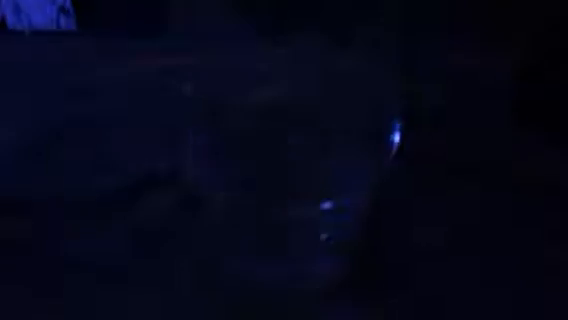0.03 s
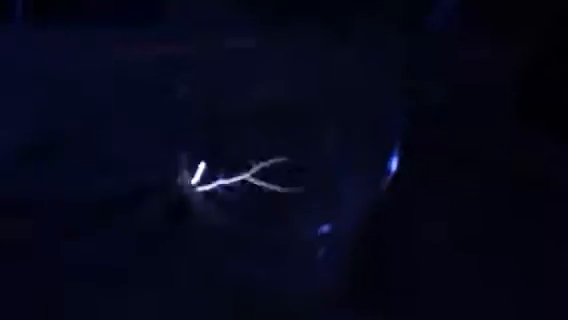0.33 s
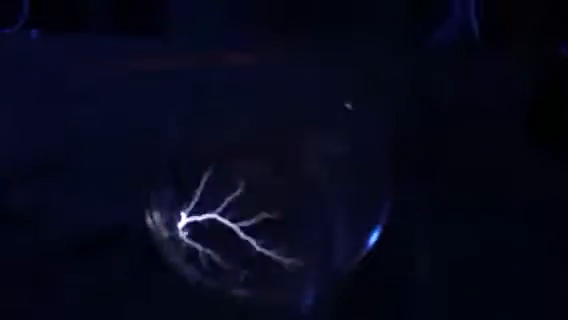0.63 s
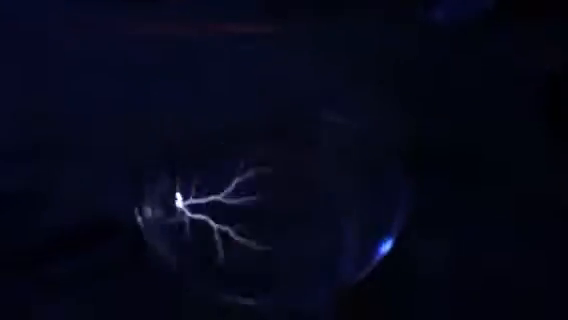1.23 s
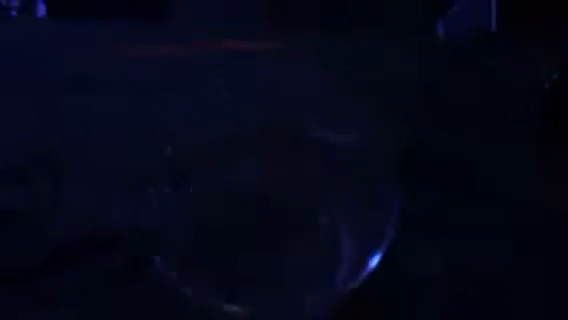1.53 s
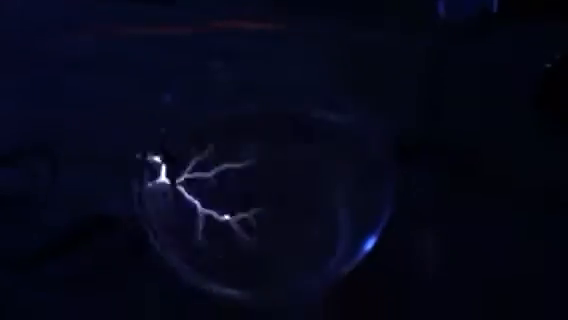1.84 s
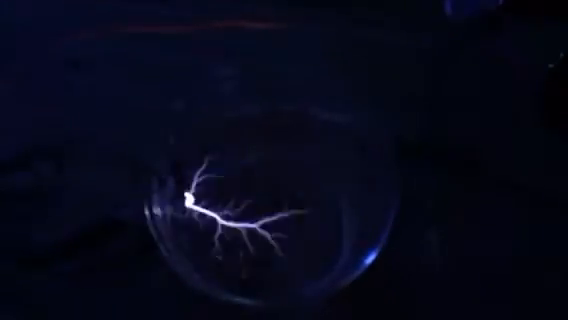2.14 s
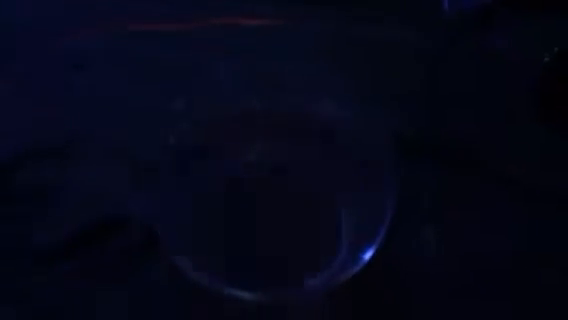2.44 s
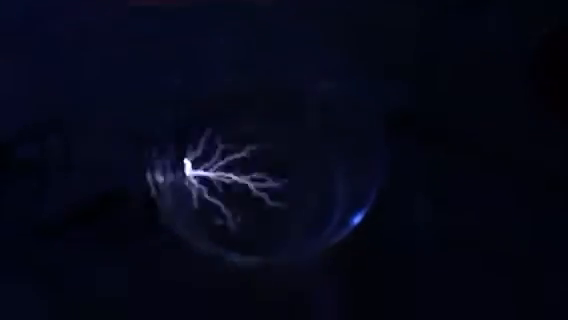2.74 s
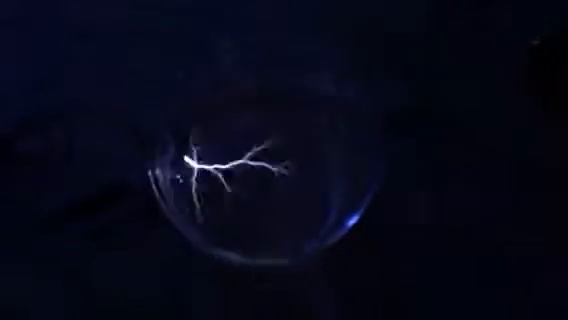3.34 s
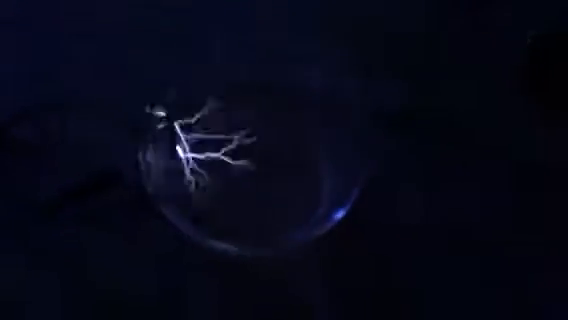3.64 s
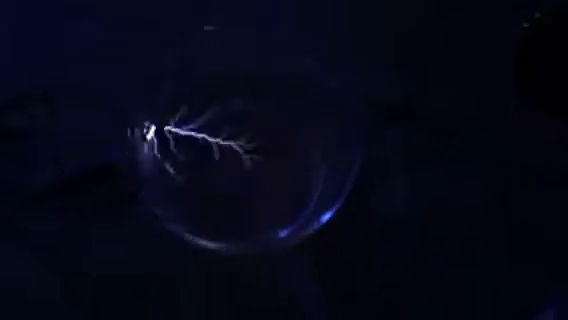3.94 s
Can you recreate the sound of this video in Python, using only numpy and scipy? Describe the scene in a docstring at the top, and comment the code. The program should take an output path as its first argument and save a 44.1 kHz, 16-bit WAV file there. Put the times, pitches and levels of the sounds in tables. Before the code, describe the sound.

High-voltage sparks snap in a rapid, steady stream inside a glass globe, making a harsh crackling buzz. Occasional low thumps hit the close microphone, and a small hard room adds bright, short echoes.

```python
"""Sparks in a glass globe

High-voltage sparks, about thirty a second, jump close to a microphone in a small hard room.
Each snaps with its own colour, rings the glass and returns as bright echoes and a short hiss
of reverberation. Each is followed by a small low microphone thump, some by a loud one.
A faint room rumble lies underneath."""
import sys
import numpy as np
from scipy import signal
from scipy.io import wavfile

SR = 44100
rng = np.random.default_rng(int(sys.argv[2]) if len(sys.argv) > 2 else 0)


def to_wav(s):
    """Save 16-bit WAV."""
    ch = np.atleast_2d(s).T  # columns
    pcm = np.round(np.clip(ch, -1, 1) * 32767)  # PCM
    wavfile.write(sys.argv[1], SR, pcm.astype(np.int16))


N = 176400

# sparks, with strength in four registers: t/s, knock/dB, bite/dB, sizzle/dB, fizz/dB
SPARKS = [(0.1209, -4.5, -6, -1, 2), (0.1613, 1, -9, -1, -0.5), (0.1665, 2, -6, -4, -8),
          (0.2093, -1, 1, 2.5, 2), (0.2456, 3, -7, -2, 2), (0.2538, -8, -2, -0.5, -6),
          (0.2934, 2.5, -2, -1.5, 2), (0.3016, -2, -3, -2, -6), (0.3437, 7.5, -11, 5, 2),
          (0.3906, 4, -1.5, 1.5, 1), (0.4272, 4.5, -4, -2, 0), (0.438, 0, -6, 1, -3),
          (0.4757, 8.5, -12, 6, -1.5), (0.511, 1, -3, -1.5, -1), (0.5456, 3.5, 0, -6, -1),
          (0.5913, 6, 1, 0, -9), (0.6271, 0, -3, -3, 0), (0.6614, 3.5, -0.5, -8, 1.5),
          (0.7084, 3.5, 1, 0.5, 1), (0.7444, -3, -5, -1, 0), (0.7782, 3.5, 1.5, 2, -5),
          (0.8245, 1.5, 3, 4, -1), (0.8607, -2, -3, -3, 0), (0.8939, 2.5, 1.5, 3, 0),
          (0.9405, 1, 2, 2.5, -1), (0.9765, 0, -1, -1, -1.5), (1.0107, 4, 4, 1, 0),
          (1.0447, 0, -3, -1.5, 0), (1.0785, 3, 2.5, 3, -3), (1.1247, 3, 1.5, 3.5, -6),
          (1.1608, 0.5, -3.5, -1, 2), (1.1947, 4, 5.5, 1.5, -4), (1.241, 4.5, 3.5, 2, 1.5),
          (1.2771, 0, -2, -2, -0.5), (1.3115, 3, 4, 2.5, -2), (1.3579, 3, 3, 3, -2),
          (1.3942, 0, -2.5, 1, 0), (1.4026, -4.5, -5, 1, -8), (1.444, 6, -10.5, 5, 0.5),
          (1.4918, 4, 4.5, -5, -4), (1.5271, -1, -4, -2.5, 4.5), (1.5376, 4, 0, -2, -3),
          (1.5762, 6.5, -11, 4, -1), (1.6245, 3.5, 4.5, 1.5, 2), (1.6615, -4, -5, -1, -1),
          (1.6684, 0.5, -2, 1, -1), (1.711, 2.5, -10, 5, 0.5), (1.7583, 2, 6, 2, -2), (1.794, 2, -4, 1, 2),
          (1.8034, 2, -2, -3, -3), (1.843, -14, -5, -4, -3), (1.851, 0.5, 0, 0, 0),
          (1.8941, 5.5, -10, 4.5, -2), (1.9409, 4, 3.5, 2, 0), (1.9775, -0.5, -4, -2, -0.5),
          (2.0242, 2.5, 3.5, 3, 3), (2.0606, -2, -4, 3, 1), (2.0704, 3.5, 3.5, -5, -8),
          (2.1102, -0.5, 0.5, 0, 1.5), (2.118, -1, -6, -4, -3), (2.1588, -2, 2, 0.5, 0),
          (2.1948, 1.5, -1, 1, 0.5), (2.2008, -1, -3, -4, -7), (2.2435, 0, 3.5, 2, -3),
          (2.2515, -5, 0.5, 1.5, -1), (2.2938, 6, -8, 5.5, -2), (2.3413, 2.5, 6.5, -3.5, -7),
          (2.3778, -11, -0.5, 5, -1), (2.386, 2, -1, -3, -3), (2.4267, -5, -1, -3, -3),
          (2.4344, -6, 1, -2, -1), (2.4764, 3.5, -0.5, 5.5, -1), (2.5124, -20, -4, -4, -3),
          (2.5186, 1, 0, -2, -2), (2.5613, -2, 5, 1, -1), (2.5655, 2, -4, -5, -4),
          (2.6085, 2.5, -5, 6.5, 0), (2.6438, -5, -1.5, -1, -2), (2.6789, 3.5, 5, 6.5, -1.5),
          (2.7247, 1, 4, -11, 1), (2.7593, -1.5, 0, -3, -2), (2.794, 1.5, 3.5, 3, -6),
          (2.8417, -1, 3.5, -8, 5), (2.877, 0, 1, 0, -2), (2.8868, 1, -1, -2, -3),
          (2.9248, -4, -2.5, -3, -1), (2.9369, -1, -0.5, 0, 0), (2.9768, 3, 3, -12, 4.5),
          (3.0231, -2.5, 3, 0.5, 0.5), (3.06, -2.5, 2.5, -1, 1), (3.1069, 4.5, 3, 6, 1),
          (3.1447, -3, 1.5, 2, 1), (3.1523, 3.5, 0, -5, -8), (3.1928, -13, -4, -5, 0),
          (3.1997, -1, 2, 1, -6), (3.2436, 6.5, -12, 3.5, -3), (3.2782, -4, -1, -6, -2),
          (3.311, 5, 4, -6, 6), (3.358, 2.5, 5.5, 3.5, 0), (3.3951, -5, -4, -1.5, 3),
          (3.4023, 2, 1.5, -2, -5), (3.4439, -2.5, -2, -3, 0), (3.4498, -8, 0, -3, -3),
          (3.4938, 3, -0.5, -5.5, 5.5), (3.5405, -0.5, 4, 1.5, 1.5), (3.5769, -0.5, -2, 1, 1),
          (3.5868, -1, 2.5, -1, -3), (3.6265, 4, 1, -8, 6.5), (3.6739, 4.5, 4.5, 3.5, -3),
          (3.7096, -5, -3.5, -1, -1), (3.7433, 1.5, 5, 6, -4), (3.7785, -3.5, -2, 0, -3),
          (3.7857, -5, -2, 1, -4), (3.827, 0.5, 0.5, 2, -1), (3.834, -3, -1.5, 1, -4),
          (3.8768, -1, 5.5, 1, 2), (3.9242, -2, 5.5, -4, -6), (3.958, 0, -1.5, 0, -5),
          (3.97, 2.5, 1.5, 1.5, -1)]


def amp(db):
    """Decibels to gain."""
    return 10 ** (np.asarray(db) / 20)


def unit(x):
    """Scale to unit energy."""
    return x / np.sqrt(np.sum(x ** 2) + 1e-20)


def add(mix, start_s, sound):
    """Mix a sound in at start_s."""
    part = mix[max(round(start_s * SR), 0):][:len(sound)]
    part += sound[:len(part)]


def through(x, response):
    """Convolve, keeping the length of x."""
    return signal.fftconvolve(x, response)[:len(x)]


def causal(colour, size):
    """Minimum-phase pulse with a given spectrum (f/Hz, level/dB)."""
    hz, db = np.transpose(colour)
    bins_hz = abs(np.fft.fftfreq(size, 1 / SR))
    log_gain = np.log(amp(np.interp(np.log(bins_hz + 1), np.log(hz), db)))
    spectrum = np.exp(np.conj(signal.hilbert(log_gain)))
    return np.fft.ifft(spectrum).real[:size // 2]


def click(colour):
    """Coloured pulse of unit energy."""
    return unit(causal(colour, size=4096))


def train(times_s, levels_db):
    """One impulse per event."""
    impulses = np.zeros(N)
    for start_s, db in zip(times_s, levels_db):
        add(impulses, start_s, amp([db]))
    return impulses


def envelope(delay_s, rise_s, t60_s):
    """Wait, rise, exponential decay; 0.5 s long."""
    t = np.maximum(np.arange(SR // 2) / SR - delay_s, 0)
    return (1 - np.exp(-t / rise_s)) * np.exp(-np.log(1000) * t / t60_s)


def ringing(modes, delay_s, rise_s):
    """Sum of damped sines."""
    t = np.arange(SR // 2) / SR - delay_s
    return sum(amp(db) * envelope(delay_s, rise_s, t60_s) * np.sin(2 * np.pi * hz * t)
               for hz, db, t60_s in modes)


def reverberate(x, colour, delay_s, rise_s, t60_s, tails):
    """Dense reflections whose fine texture slowly changes from spark to spark."""
    tail_index = np.linspace(0, tails - 1, N)
    shape = envelope(delay_s, rise_s, t60_s)
    wet = np.zeros(N)
    for k in range(tails):
        tail = unit(through(rng.standard_normal(len(shape)) * shape, click(colour)))
        fade = np.cos(np.pi / 2 * np.minimum(abs(tail_index - k), 1))
        wet += through(x * fade, tail)
    return wet


def discharges(ripples, shares):
    """Spark pressure pulses. Arc branches interfere and ripple each spectrum at random."""
    # centres of knock, bite, sizzle, fizz: f/Hz
    registers_hz = [1400, 3300, 6800, 12500]
    ripple_db, ripple_corner_hz = 4, 4200
    hz = np.linspace(700, 16000, ripples.shape[1])
    pulses = np.zeros(N)
    for (start_s, *levels_db), ripple in zip(SPARKS, ripples):
        db = np.interp(np.log(hz), np.log(registers_hz), np.multiply(levels_db, shares))
        db += ripple_db * ripple * hz / (hz + ripple_corner_hz)
        add(pulses, start_s, causal(np.column_stack([hz, db]), size=512))
    return pulses


def snaps(pulses):
    """Direct crack of each spark."""
    # crack spectrum: f/Hz, level/dB
    snap_colour = [(100, -64), (500, -15), (800, -17.5), (1050, 3), (1500, 5), (2300, 0), (3500, 1.5),
                   (6000, -8), (10000, -8), (16000, -16)]
    return amp(4.5) * through(pulses, click(snap_colour))


def rumble():
    """Faint low room noise, from the first spark on."""
    # noise spectrum: f/Hz, level/dB
    rumble_colour = [(20, -36), (45, -13), (70, 4.5), (130, -19), (300, -5.5), (700, -17.5), (3000, -48)]
    started = np.arange(N) / SR > SPARKS[0][0]
    return started * amp(-51.5) * through(rng.standard_normal(N), click(rumble_colour))


def thumps():
    """The microphone swings back, slowing: a little after every spark, a lot after some."""
    # loud thumps: t/s, level/dB
    loud_thumps = [(0.389, -25), (0.4763, -38), (0.5451, -17), (0.5912, -20.5), (0.8604, -24),
                   (0.8951, -17), (0.9408, -20), (1.078, -28.5), (1.241, -22), (1.3115, -25), (1.3582, -20),
                   (1.4912, -16), (1.625, -29), (1.6594, -25), (1.711, -28), (1.7587, -23), (1.843, -16),
                   (1.852, -29), (1.9412, -17.5), (2.024, -11), (2.0608, -27), (2.2938, -35), (2.3415, -19),
                   (2.377, -28), (2.5117, -21.5), (2.6792, -21), (2.724, -21), (2.795, -25.5),
                   (2.841, -28.5), (2.9377, -25), (3.024, -23), (3.0596, -28), (3.1067, -9), (3.243, -28),
                   (3.2775, -34), (3.359, -28), (3.493, -29), (3.9241, -14)]
    # low microphone resonances: f/Hz, level/dB, t60/s
    microphone_modes = [(80.7, -7, 0.051), (340, -18, 0.053)]
    start_hz, end_hz, sag_s = 468, 47.5, 0.0027
    delay_s, rise_s, decay_s = 0.00061, 0.0017, 0.01
    t = np.arange(SR // 8) / SR
    hz = end_hz + (start_hz - end_hz) * np.exp(-t / sag_s)
    shape = (1 - np.exp(-t / rise_s)) * np.exp(-t / decay_s)
    swing = -np.sin(2 * np.pi * np.cumsum(hz) / SR) * shape
    swing += ringing(microphone_modes, delay_s=0.00056, rise_s=0.0049)[:len(t)]
    spark_s, knock_db = np.transpose(SPARKS)[:2]
    loud_s, loud_db = np.transpose(loud_thumps)
    small = train(spark_s + delay_s, knock_db - 36.5)
    loud = train(loud_s + delay_s, loud_db + 1)
    return through(small + loud, swing)


def globe(pulses):
    """The glass rings and scatters each crack."""
    # globe resonances: f/Hz, level/dB, t60/s
    glass_modes = [(2066, -34.5, 0.044), (2630, -36.5, 0.07), (3024, -18, 0.035), (3234, -28, 0.017),
                   (3822, -28, .035), (4407, -26, 0.034), (4520, -23, 0.05), (5230, -64, .03),
                   (5905, -22, 0.024), (7390, -30, 0.024), (8485, -25, 0.021)]
    # spectrum of the scattered crack: f/Hz, level/dB
    scatter_colour = [(100, -30), (750, -13.5), (1200, 0.5), (2200, 1.5), (3300, -3), (6000, 1), (8000, -9),
                      (10500, -4), (16000, -4.5)]
    ring = through(pulses, ringing(glass_modes, delay_s=0.001169, rise_s=0.0011))
    scatter = reverberate(pulses, scatter_colour, delay_s=0.0027, rise_s=0.0004, t60_s=0.015, tails=8)
    return amp(1) * ring + amp(2.5) * scatter


def echoes(pulses):
    """Distinct bright reflections; delays shift slightly from spark to spark."""
    # reflections off near surfaces: delay/s, level/dB
    reflections = [(.0013, -7.5), (.0084, 0.5), (.0094, -5), (.0133, -29), (.0142, -17), (.0169, 0),
                   (.0188, -8), (.0291, -8.5)]
    # echo spectrum: f/Hz, level/dB
    echo_colour = [(100, -31), (700, -13), (1100, -4.5), (1700, -16), (2700, -10), (4500, -1.5),
                   (7000, 2.5), (10500, 0.5), (13000, 4.5), (16000, -2.5)]
    jitter_s = 0.00005
    spark_s = np.transpose(SPARKS)[0]
    n = np.arange(N)
    reflected = np.zeros(N)
    for delay_s, db in reflections:
        drift = np.interp(n / SR, spark_s, rng.standard_normal(len(spark_s)))
        lag = (SR * (delay_s + jitter_s * drift)).astype(int)
        reflected += amp(db) * pulses[np.clip(n - lag, 0, N - 1)]
    return amp(0.5) * through(reflected, click(echo_colour))


def room(pulses):
    """Hissing reverberation and standing waves between hard walls."""
    # reverberation spectrum: f/Hz, level/dB
    hiss_colour = [(100, -19.5), (400, -26), (620, -7.5), (820, -21.5), (1020, 3.5), (1350, 1), (2400, -2),
                   (3100, 7), (4000, 0.5), (6000, 4.5), (8000, -2), (8900, 5), (10300, -5), (12500, 1),
                   (16000, -5)]
    # standing waves: f/Hz, level/dB, t60/s
    room_modes = [(965, -51, 0.62), (1076.3, -53, 0.32), (1160, -48, 0.3), (1299, -44, 0.1),
                  (1392, -44.5, 0.21), (1500, -42, 0.29), (1595, -40, 0.35), (1673, -47, 0.42),
                  (1729, -45, 0.22), (2015, -35.5, 0.13), (2724, -50, .25), (3230, -49, 0.25)]
    hiss = reverberate(pulses, hiss_colour, delay_s=0.0064, rise_s=0.004, t60_s=0.22, tails=3)
    standing = through(pulses, ringing(room_modes, delay_s=0.0020095, rise_s=0.0035))
    return amp(4.5) * hiss + amp(3) * standing


def scene():
    """All paths summed at one microphone."""
    ripples = rng.standard_normal((len(SPARKS), 18))
    # shares: how strongly a path follows knock, bite, sizzle, fizz
    direct = discharges(ripples, shares=[0.97, 0.72, 0.76, 0.87])
    to_globe = discharges(ripples, shares=[0.37, 1, 0.89, 0.96])
    to_room = discharges(ripples, shares=[0.3, 0.7, 0.9, 1])
    sparks = snaps(direct) + thumps() + globe(to_globe) + echoes(to_room) + room(to_room)
    return (sparks + rumble())[None]


def record(dry):
    """Soft overload, then low-pass."""
    ceiling, cutoff_hz = 0.8, 15900
    squashed = ceiling * np.tanh(dry / ceiling)
    lowpass = signal.firwin(511, cutoff_hz, window=("kaiser", 9), fs=SR)
    return signal.oaconvolve(squashed, lowpass[None], "same")


dry = scene()
out = record(dry)
to_wav(out)
```